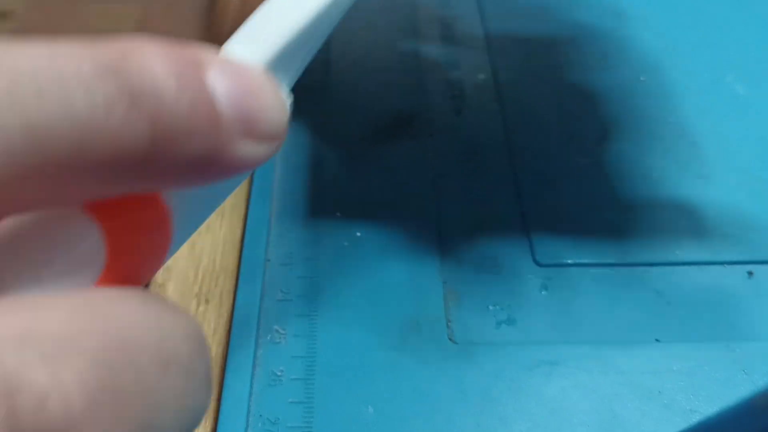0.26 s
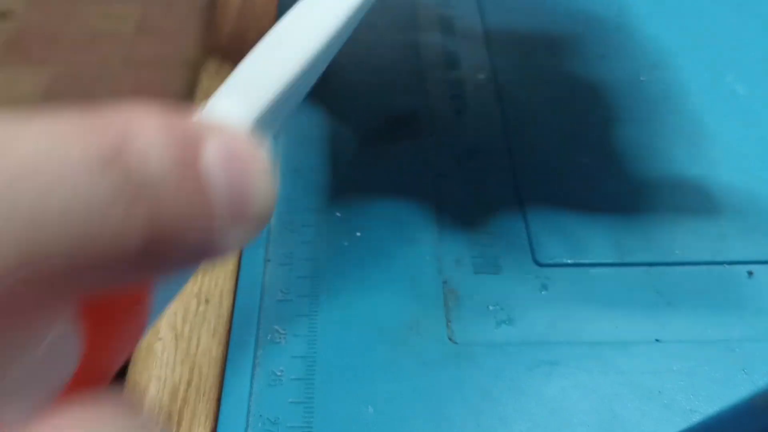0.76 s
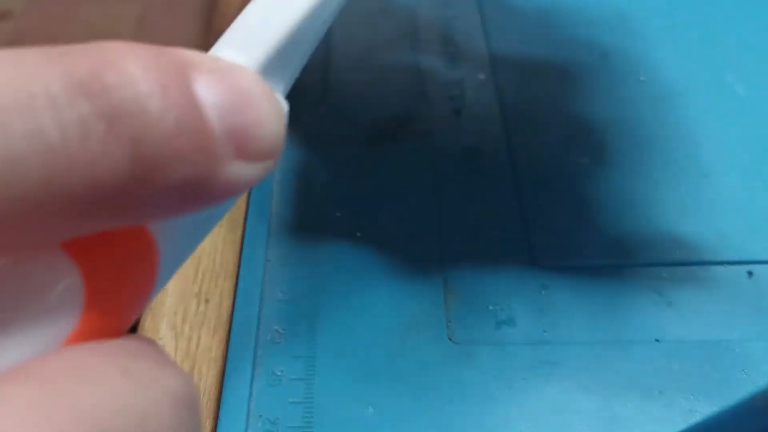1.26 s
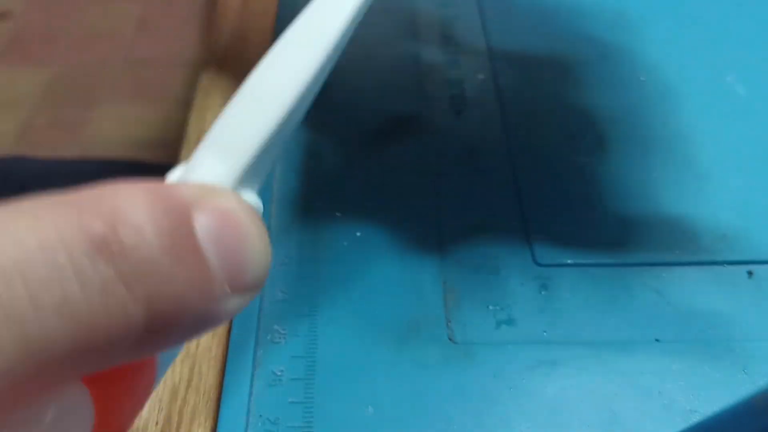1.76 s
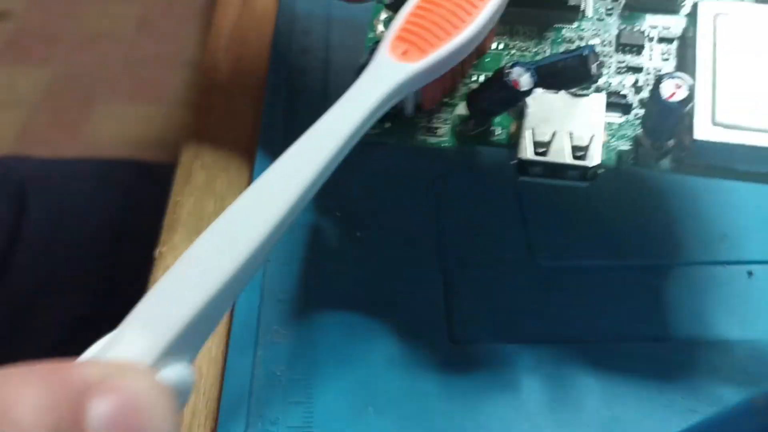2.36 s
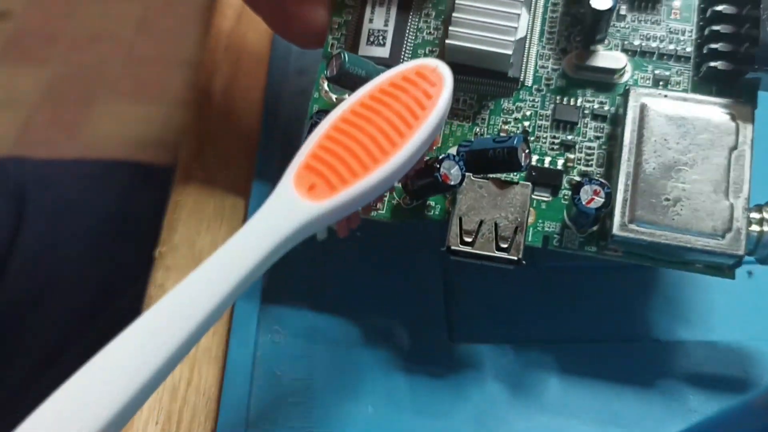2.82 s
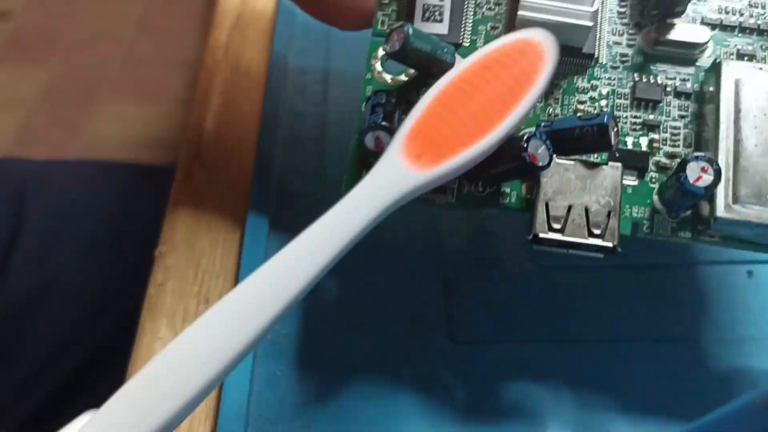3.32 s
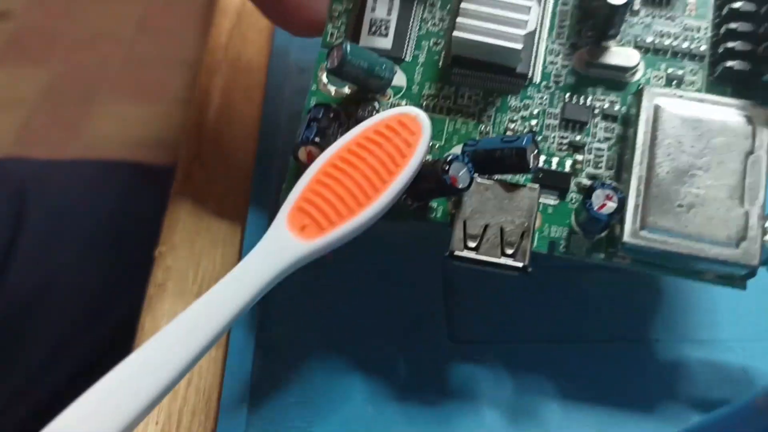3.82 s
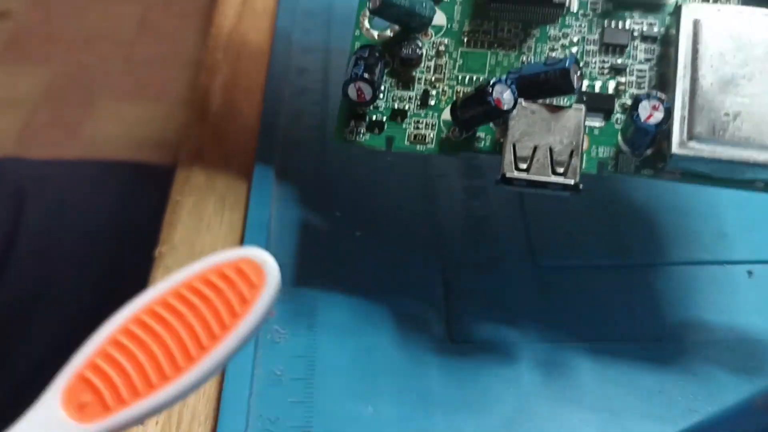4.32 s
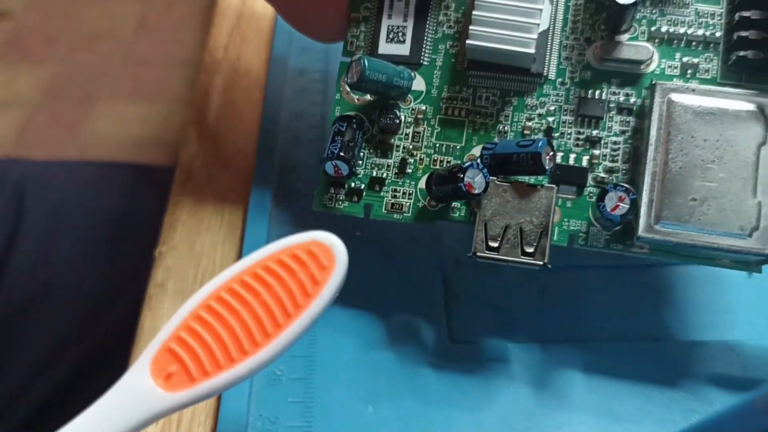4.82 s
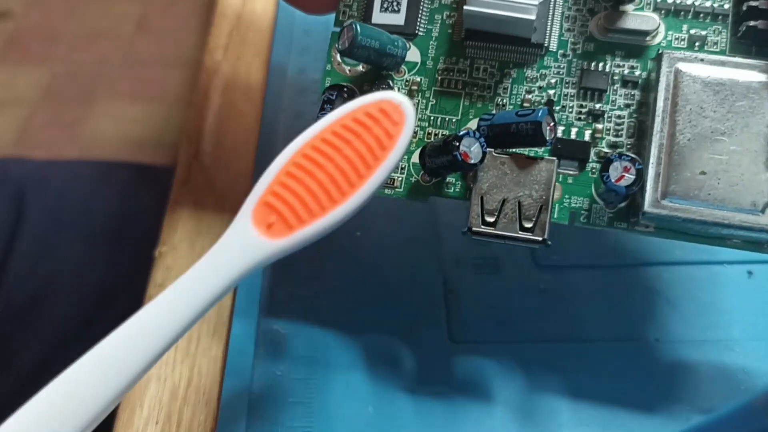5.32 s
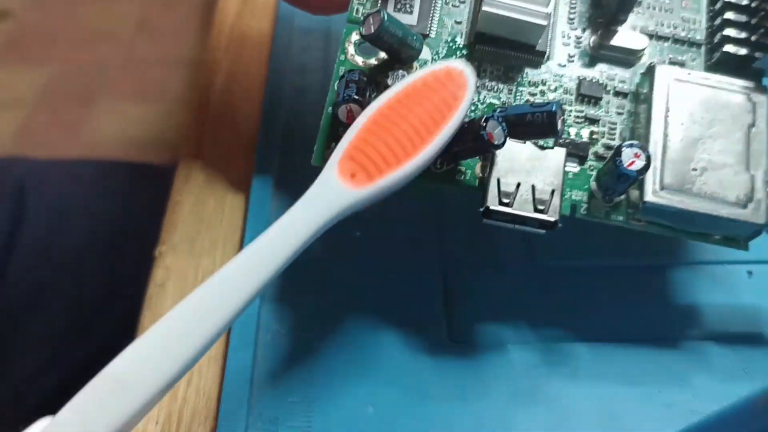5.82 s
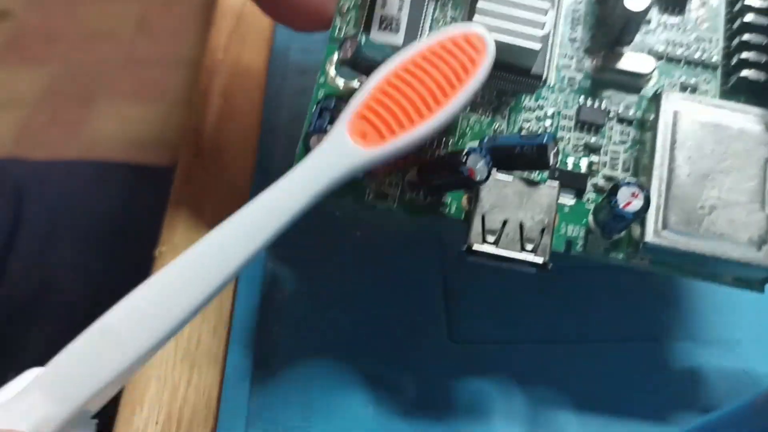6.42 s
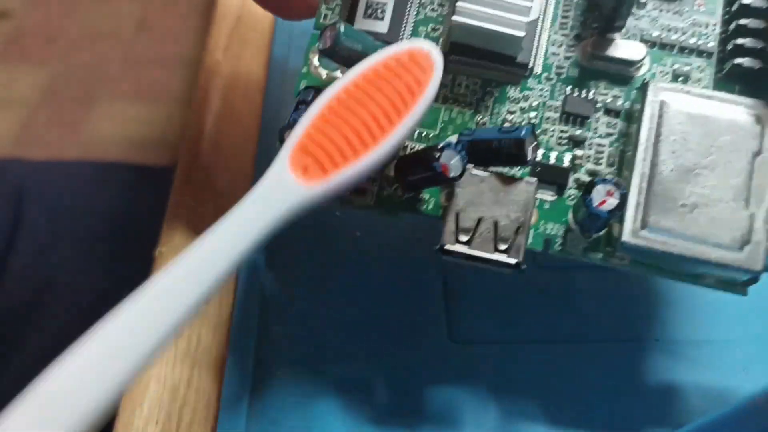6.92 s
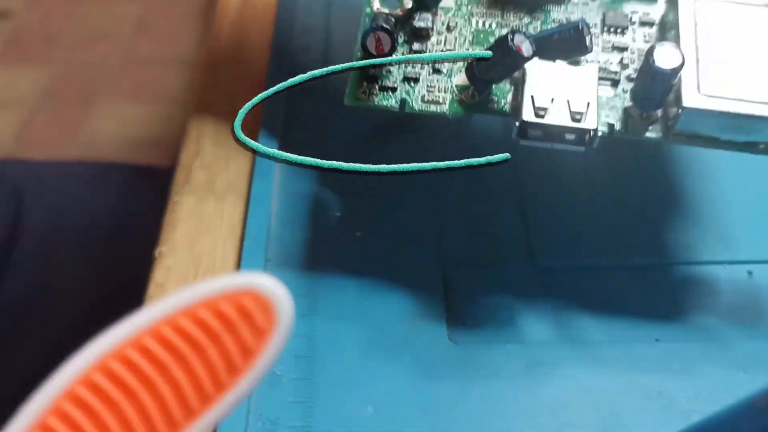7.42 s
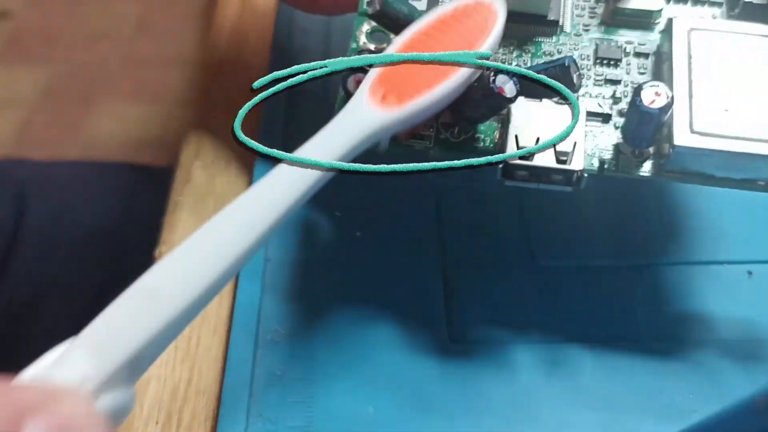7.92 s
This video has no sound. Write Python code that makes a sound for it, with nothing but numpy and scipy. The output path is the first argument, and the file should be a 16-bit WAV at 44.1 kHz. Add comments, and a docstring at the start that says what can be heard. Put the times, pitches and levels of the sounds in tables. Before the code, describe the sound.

Dry, crisp brushing at very close range: stiff bristles rasp and hiss quickly to and fro over a hand-held board, with bright clicks and hard plastic-on-metal taps. Bouts come and go with lifts between them, the longest silence in the middle, and scrubbing returns gently before growing firmer. Soft low thumps and dull finger rubs come from the shifting board. A quiet room with a short reflection, low air rumble and a weak electrical hum underneath.

```python
"""A toothbrush scrubs a hand-held circuit board: strokes from 0 s, the plastic head knocking on a metal can.
From 1.2 s tufts spring off capacitors and the head hits the board's rim; at 2.4 s the board bumps a bench mat.
From 3.0 to 4.3 s the head hits a socket; board and fingers thump and rub six times from 2.1 to 4.1 s.
After a pause, scrubbing resumes from 5.5 to 7.3 s and again from 7.9 s to the end.
Throughout, filtered noise makes the air and sine harmonics the mains hum, which dips near 1.9 and 3.1 s."""
import sys
import numpy as np
from scipy import signal
from scipy.fft import rfft, irfft, next_fast_len
from scipy.io import wavfile

SR = 44100
rng = np.random.default_rng(int(sys.argv[2]) if len(sys.argv) > 2 else 0)


def master(y):
    """Save y as 16-bit WAV."""
    cut = np.clip(np.atleast_2d(y).T, -1, 1)
    pcm = np.round(cut * 32767)  # scale
    wavfile.write(sys.argv[1], SR, pcm.astype(np.int16))


N = 360297
T = np.arange(N) / SR
FFT_SIZE = 2 * next_fast_len(N // 2 + SR // 4, True)
FREQS_HZ = np.fft.rfftfreq(FFT_SIZE, 1 / SR)
RING_SAMPLES = 2048

# Passes of the bristles, each until the next turn or lift. Each row: start in seconds, level in dB.
STROKES = [(-0.01, -49), (0.092, -55), (0.183, -50), (0.296, -49), (0.39, -49), (0.508, -50),
           (0.598, -49.5), (0.72, -46), (0.801, -47), (1.249, -51.5), (1.36, -49), (1.49, -45),
           (1.585, -49), (1.688, -50), (1.787, -48.5), (1.882, -54), (1.981, -51.5), (2.097, -49.5),
           (2.19, -50.5), (2.33, -53), (2.466, -54), (2.56, -67), (3.025, -61), (3.155, -48.5),
           (3.278, -51.5), (3.4, -52.5), (3.51, -48.5), (3.605, -49.5), (3.712, -50), (3.812, -50.5),
           (3.94, -49), (4.026, -49), (4.194, -52.5), (5.51, -70), (5.692, -60), (5.814, -52.5),
           (5.966, -52), (6.075, -50), (6.205, -53), (6.312, -51.5), (6.43, -50.5), (6.539, -48.5),
           (6.642, -55.5), (6.754, -51.5), (6.89, -51), (6.986, -62), (7.075, -49), (7.16, -48),
           (7.936, -47), (7.999, -52), (8.112, -48.5)]
# Moments the brush leaves the board, in seconds.
LIFTS_S = [0.935, 2.39, 2.75, 3.135, 4.143, 4.32, 7.305, 8.22]
# Brush or board striking something. Each row: time in seconds, blow level in dB, contact name.
KNOCKS = [(0.1708, -49.5, "pin"), (0.353, -31, "can"), (0.5635, -31, "can"), (0.7676, -28.5, "can"),
          (0.817, -47, "pin"), (1.2262, -54, "tips"), (1.2748, -38.5, "tips"), (1.279, -44, "edge"),
          (1.3826, -46, "capacitor"), (1.4717, -47.5, "capacitor"), (1.6112, -41.5, "capacitor"),
          (1.7444, -44, "edge"), (1.818, -43, "edge"), (1.9345, -40.5, "edge"), (2.017, -41.5, "capacitor"),
          (2.1435, -33.5, "edge"), (2.3542, -45.5, "tips"), (2.373, -44, "mat"), (2.5065, -55, "tips"),
          (2.61, -62, "tips"), (2.6914, -69, "tips"), (3.0052, -61.5, "tips"), (3.0349, -44.5, "tips"),
          (3.0958, -34.5, "socket"), (3.176, -46.5, "tips"), (3.2662, -45, "capacitor"),
          (3.3514, -31.5, "socket"), (3.5641, -32.5, "socket"), (3.629, -40, "capacitor"),
          (3.771, -30.5, "socket"), (3.8348, -33.5, "capacitor"), (3.9935, -34, "socket"),
          (4.0586, -35, "capacitor"), (5.5145, -56.5, "tips"), (5.778, -51.5, "capacitor"),
          (6.0977, -42, "capacitor"), (6.5034, -36.5, "socket"), (6.569, -42, "capacitor"),
          (6.791, -44.5, "capacitor"), (6.806, -44.5, "pin"), (6.9476, -46.5, "capacitor"),
          (7.047, -37, "pin"), (7.1287, -37.5, "socket"), (7.187, -47, "capacitor"),
          (7.9466, -39.5, "tips")]
# Contacts: can, edge (bare rim) and socket are hit by the head; mat is the board on the bench mat;
# a tuft springs off capacitor or pin; tips are bristle tips landing.
# Each entry: board clack in Hz, clack over board modes in dB, board re blow in dB,
# part clack in Hz, part clack width in Hz, bristle snap re blow in dB before the rise with blow level.
CONTACTS = {"can": (2024, 8, -7, 3203, 1100, -8), "edge": (898, 9, -6, 3178, 1000, -6),
            "socket": (1594.5, 8.5, -2.5, 4950, 2401.5, 2), "mat": (525, 16.5, 4, 3300, 1400, 1),
            "capacitor": (1620, 13, -12, 3254, 795, -8), "pin": (1502, 6, -11.5, 4330, 1100, -9),
            "tips": (1600, 1, -8.5, 5502, 2000, 0.5)}
# Harder blows snap the tufts more. Each row: blow level in dB, extra snap in dB.
SNAP_RISE = [(-31.5, -2), (-30, 4.5)]
# Dry broad crack of plastic on the board. One row: frequency in Hz, width in Hz, level in dB.
CRACK_MODE = (2700, 2200, 11.6)
# Resonances of the board. Each row: frequency in Hz, width in Hz, relative level in dB.
BOARD_MODES = [(393, 240, -8), (630, 140, -5), (837, 380, 3.5), (1010, 162, -3), (1550, 53, -6),
               (2032, 70, -5), (2294, 120, -8)]
# Resonances of the metal parts. Each row: frequency in Hz, width in Hz, relative level in dB.
METAL_MODES = [(2570, 170, -19), (3228, 130, -2), (3280, 94, 1.5), (3980, 23, -25), (4130, 89, -4),
               (4414, 99, -4), (5000, 380, -7), (5870, 52, -7.5), (6300, 240, 1)]
# Spectrum of the rasp on the board. Each row: frequency in Hz, relative density in dB per Hz.
SCRAPE_SPECTRUM = [(300, -12), (700, -14.5), (1000, -1.5), (1230, -8.5), (1560, -2.5), (2600, -3.5),
                   (3300, 3), (4500, -1), (6400, 2), (7200, -2), (9000, -4), (12000, -27)]
# Spectrum of the bristle tips' hiss. Each row: frequency in Hz, relative density in dB per Hz.
TIPS_SPECTRUM = [(3000, -17.5), (7000, -29), (9000, -11), (11200, -3), (11800, 3), (13000, 1.5),
                 (14200, -1.5), (15700, -4), (17000, -50)]
# Spectrum of a tuft snapping off an edge. Each row: frequency in Hz, relative density in dB per Hz.
SNAP_SPECTRUM = [(300, -47), (1500, -14), (4000, -10), (8000, -11), (10500, 7.5), (12000, 19), (13500, 11),
                 (16000, -8)]
# Shifts of the board in the hand. Each row: time in seconds, thump in dB, finger rub in dB.
BUMPS = [(2.137, -59, -53), (2.459, -66, -58.5), (2.762, -63, -60), (3.224, -53, -56.5),
         (3.802, -52.5, -74), (4.08, -52, -57)]
# Mains harmonics. Each row: frequency in Hz, left level in dB, right level in dB, before wavering.
HUM_HARMONICS = [(100, -76.5, -72.5), (150, -72.5, -69), (200, -99, -67.5), (250, -80.5, -75.5),
                 (300, -67.5, -70), (400, -79.5, -63.5), (450, -104, -88), (500, -62, -56),
                 (550, -86, -76.5), (600, -85.5, -68.5), (650, -89, -77.5)]
# Swell of the strongest harmonic. Each row: time in seconds, gain in dB.
HUM_SWELL = [(0, -1.5), (1.6, -1.5), (1.9, -10), (2.3, -1.5), (2.87, -1.5), (2.98, -11), (3.1, -13.5),
             (3.25, -2), (8.2, -0.5)]
# Spectrum of the room air. Each row: frequency in Hz, relative density in dB per Hz.
AIR_SPECTRUM = [(30, -9), (50, -25), (70, -3), (140, 0.5), (250, -7.5), (450, -7), (650, -15), (900, -18.5),
                (2500, -22.5), (4500, -29), (8000, -36.5), (10500, -37), (12000, -30), (15500, -35)]

SPEED_UP_S, SLOW_DOWN_S = 0.058, 0.057  # same for every stroke
CREEP_POWER = 0.013  # power share left at a turn, while the bristles bend over
SCRAPE_DB, HISS_DB = -2.7, 3  # re stroke level
SCRAPE_GROWTH_DB, HISS_GROWTH_DB = -4.5, 1  # start to end of a stroke, as the bristles bend over
THUMP_HZ, RUB_HZ, BUMP_HALF_S = 102, 350, 0.04
HIGHPASS_HZ, TOP_HZ = 50, 15900


def stroke_gain(growth_db):
    """The hand speeds up, glides and slows to the next turn; bristle power follows its speed."""
    stops = np.array([start for start, db in STROKES] + LIFTS_S)
    gain = np.zeros(N)
    for start, db in STROKES:
        stop = stops[stops > start].min()
        a, b = np.searchsorted(T, [start, stop])
        rise = np.minimum((T[a:b] - start) / SPEED_UP_S, 1)
        fall = np.minimum((stop - T[a:b]) / SLOW_DOWN_S, 1)
        speed = np.sin(np.pi / 2 * rise) * np.sin(np.pi / 2 * fall)
        along = (T[a:b] - start) / (stop - start) - 0.5
        gain[a:b] = undb(db + growth_db * along) * np.sqrt(speed ** 2.72 + CREEP_POWER)
    return gain


def flicks(rate_hz, spread_db, apart):
    """Bristles letting go: impulses of random size, each sent unevenly to the two ports."""
    out = np.zeros((2, N))
    at = rng.integers(0, N, int(rate_hz * N / SR))
    sizes = undb(spread_db * np.minimum(rng.exponential(size=len(at)), 4))
    signs = rng.choice([-1, 1], len(at))
    out[:, at] = sizes * (signs + apart * rng.standard_normal((2, len(at))))
    return unit(out)


def part_pings():
    """Stiff bristles pluck each resonance at its own random moments, so the colour flickers."""
    pings = np.zeros((2, N))
    for hz, width_hz, db in BOARD_MODES[4:] + METAL_MODES:
        plucks = flicks(rate_hz=45, spread_db=2.6, apart=0.7)
        b, a = signal.iirpeak(hz, hz / (width_hz + 220), fs=SR)
        pings += undb(0.5 * db) * unit(signal.lfilter(b, a, plucks))
    return unit(pings)


def scrubbing(ping_db, wander_db, ticks):
    """Through each stroke tufts catch and spring free, rasping the board, pinging the parts and hissing."""
    gain = stroke_gain(SCRAPE_GROWTH_DB)
    tufts = unit(undb(0.6 * walk(rate_hz=220) + 2.17 * walk(rate_hz=69)))
    snags = flicks(rate_hz=160, spread_db=2.5, apart=0.6)
    bristles = unit(flicks(rate_hz=5000, spread_db=0.0, apart=1.65) * tufts + ticks * snags)
    tips = unit(flicks(rate_hz=12000, spread_db=1.5, apart=1.5) * tufts + ticks * snags)
    rasp = through(bristles * gain, unit(contour(SCRAPE_SPECTRUM)))
    scrape = rasp + undb(ping_db) * part_pings() * gain
    hiss = through(tips * stroke_gain(HISS_GROWTH_DB), unit(contour(TIPS_SPECTRUM)))
    return scrape * undb(SCRAPE_DB + wander_db * walk(rate_hz=15)), hiss * undb(HISS_DB)


def knocking(clack_db, chatter, chatter_s, span_s):
    """A sharp clack pitched by contact, a short chatter of the head, and the ring of board and parts."""
    t = T[:RING_SAMPLES]
    snap = causal(contour(SNAP_SPECTRUM))
    # small things radiate no bass, the parts even less than the board
    board_cut = signal.butter(2, 380, "high", fs=SR, output="sos")
    part_cut = signal.butter(2, 1700, "high", fs=SR, output="sos")
    out = np.zeros((3, 2, N + 2 * len(t)))
    for when, level_db, contact in KNOCKS:
        i = int(when * SR)
        board_hz, spot_db, board_db, part_hz, part_width_hz, snap_db = CONTACTS[contact]
        snap_db += np.interp(level_db, *np.transpose(SNAP_RISE))
        board_modes = BOARD_MODES + [CRACK_MODE, (board_hz, 260, spot_db)]
        board = signal.sosfilt(board_cut, resonances(board_modes, scatter_db=2))
        part_clack_db = clack_db + 10 * np.log10(part_width_hz / 1100)
        part_modes = METAL_MODES + [(part_hz, part_width_hz, part_clack_db)]
        part = signal.sosfilt(part_cut, resonances(part_modes, scatter_db=2))
        hardness = np.interp(level_db, [-46, -32], [0.75, 1.3])  # bristles cushion light taps
        # the head bounces on the parts; board and bristles take a cleaner blow
        layers = [(board, board_db, 0.45), (part, 0, 0.95), (snap, snap_db, 0.4)]
        for port in (0, 1):
            rattle = rng.standard_normal(len(t)) * np.exp(-t / chatter_s) / np.sqrt(chatter_s * SR / 2)
            for k, (ring, db, bounce) in enumerate(layers):
                strike = hardness * (t == 0) + bounce * chatter * rattle
                blow = signal.fftconvolve(strike, ring)
                blow /= np.linalg.norm(blow)
                out[k, port, i:i + len(blow)] += blow * undb(level_db + db) * np.sqrt(span_s * SR)
    return out[:, :, :N]


def bumping():
    """Each shift of the board is a soft low thump and a dull rub of the fingers that hold it."""
    out = np.zeros(N)
    for when, thump_db, rub_db in BUMPS:
        a, b = np.searchsorted(T, [when - 2 * BUMP_HALF_S, when + 2 * BUMP_HALF_S])
        swell = np.exp(-((T[a:b] - when) / BUMP_HALF_S) ** 2)
        for hz, db in ((THUMP_HZ, thump_db), (RUB_HZ, rub_db)):
            band = signal.butter(2, [hz * 0.71, hz * 1.38], "band", fs=SR, output="sos")
            noise = unit(signal.sosfilt(band, rng.standard_normal(SR)))
            out[a:b] += undb(db) * swell * noise[a - b:]
    return out


def hum(waver_db):
    """Mains harmonics as sines that waver in level; the strongest one swells and sinks."""
    out = np.zeros((2, N))
    strongest = np.argmax(np.array(HUM_HARMONICS)[:, 2])
    for k, (hz, left_db, right_db) in enumerate(HUM_HARMONICS):
        phase = 2 * np.pi * (hz * T + rng.random())
        if k == strongest:
            db = np.interp(T, *np.transpose(HUM_SWELL)) + 0.31 * walk(rate_hz=2.5)
        else:
            db = waver_db * walk(rate_hz=2.8)
        pair = np.array([undb(left_db) * np.sin(phase - 0.5), undb(right_db) * np.sin(phase)])
        out += np.sqrt(2) * undb(db) * pair
    return out


def air(db, right_db):
    """Low room rumble, partly alike at both ports, under a faint unrelated hiss."""
    likeness = np.interp(FREQS_HZ, [100, 600, 1300], [0.62, 0.55, 0])
    colour = unit(contour(AIR_SPECTRUM))
    mid = through(rng.standard_normal(N), colour * np.sqrt((1 + likeness) / 2))
    side = through(rng.standard_normal(N), colour * np.sqrt((1 - likeness) / 2))
    return undb(db + 0.5 * walk(rate_hz=0.7)) * np.array([mid + side, (mid - side) * undb(right_db)])


def room(x, early_db, early_s, late_db, t60_s, treble_db, count=4):
    """Quick reflections from bench and hands, then a short tail; the echo patterns blend in drifting shares."""
    t = T[:SR // 2]
    sent = rfft(x, FFT_SIZE) * contour([(4000, 0.033), (12000, treble_db)])
    shares = np.array([walk(rate_hz=3) for _ in range(count)])
    shares /= np.linalg.norm(shares, axis=0)
    out = x.copy()
    for share in shares:
        near, far = rng.standard_normal((2, 2, len(t)))
        early = unit(near * (t > 0.001) * np.exp(-t / early_s))
        late = unit(far * (t > 0.006) * undb(-60 * t / t60_s))
        echoes = (undb(early_db) * early + undb(late_db) * late) / np.sqrt(len(t))
        out += share * irfft(sent * rfft(echoes, FFT_SIZE))[:, :N]
    return out


def ports(pair, left_db, lag_ms):
    """Two microphone ports: the sound reaches the right one later, at a set level difference."""
    late = through(pair[1], np.exp(-2j * np.pi * FREQS_HZ * lag_ms / 1000))
    gains = unit(undb(np.array([left_db, -left_db]) / 2))
    return np.array([pair[0] * gains[0], late * gains[1]])


def resonances(modes, scatter_db):
    """Ring of damped modes at unit energy; the place of the blow sets each one's share, drawn at random."""
    t = T[:RING_SAMPLES]
    ring = np.zeros(len(t))
    for hz, width_hz, db in modes:
        size = rng.choice([-1, 1]) * undb(db + scatter_db * rng.standard_normal())
        ring += size * np.exp(-np.pi * width_hz * t) * np.sin(2 * np.pi * hz * t)
    return ring / np.linalg.norm(ring)


def causal(gain):
    """Minimum-phase (most prompt) impulse response with this gain, at unit energy."""
    cepstrum = irfft(np.log(unit(gain)))
    cepstrum[1:FFT_SIZE // 2] *= 2
    cepstrum[FFT_SIZE // 2 + 1:] = 0
    return irfft(np.exp(rfft(cepstrum)))[:RING_SAMPLES]


def contour(points):
    """Gain at every frequency from (Hz, dB) points, on a log frequency axis."""
    hz, db = np.transpose(points)
    return undb(np.interp(np.log(FREQS_HZ + 1), np.log(hz), db))


def through(x, response):
    """Filter a signal by a frequency response."""
    return irfft(rfft(x, FFT_SIZE) * response)[..., :N]


def walk(rate_hz):
    """Smooth random wander at unit rms, with two random points per cycle of the rate."""
    steps = rng.standard_normal(int(2 * rate_hz * N / SR) + 2)
    return unit(np.interp(T, np.arange(len(steps)) / (2 * rate_hz), steps))


def unit(x):
    """Scale to an rms of one."""
    return x / np.sqrt(np.mean(x ** 2))


def undb(db):
    """Decibels to gain."""
    return 10 ** (np.asarray(db) / 20)


def scene():
    """Strokes and knocks share the board's modes; the directional hiss reaches mostly the left port."""
    scrape, hiss = scrubbing(ping_db=-4, wander_db=1.5, ticks=0.16)
    board, parts, snap = knocking(clack_db=18.5, chatter=0.8, chatter_s=0.0027, span_s=0.0069)
    brush = (ports(scrape, left_db=-1.5, lag_ms=0.045)
             + ports(board, left_db=6.5, lag_ms=0.1)
             + ports(parts, left_db=-0.6, lag_ms=0.093)
             + ports(hiss + snap, left_db=11.5, lag_ms=0.1))
    near = room(brush, early_db=-2.5, early_s=0.0051, late_db=-13, t60_s=0.3, treble_db=-1.0)
    return near + bumping() + hum(waver_db=1.3) + air(db=-60.5, right_db=-0.26)


def record(dry):
    """The recorder cuts the deepest rumble and the top."""
    rumble_cut = signal.butter(3, HIGHPASS_HZ, "high", fs=SR, output="sos")
    top_cut = signal.ellip(10, 0.2, 70, TOP_HZ, fs=SR, output="sos")
    return signal.sosfilt(top_cut, signal.sosfilt(rumble_cut, dry))


dry = scene()
out = record(dry)
master(out)
```